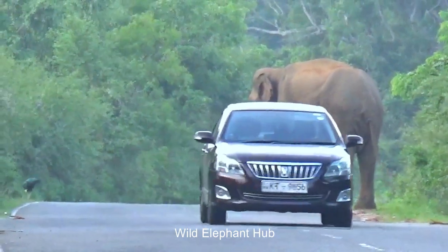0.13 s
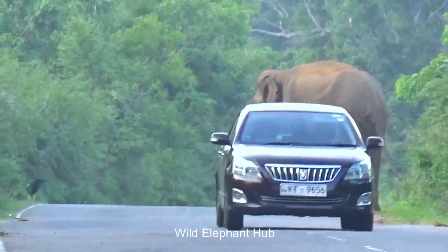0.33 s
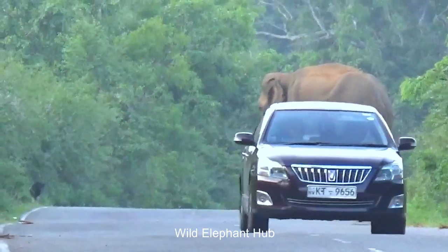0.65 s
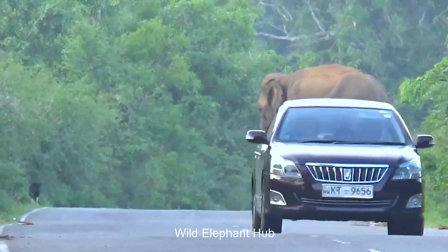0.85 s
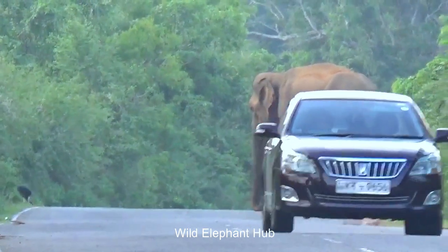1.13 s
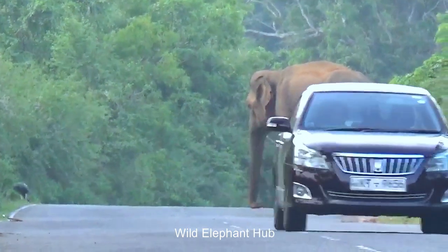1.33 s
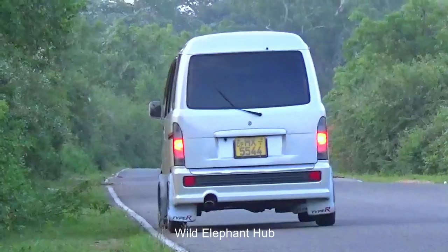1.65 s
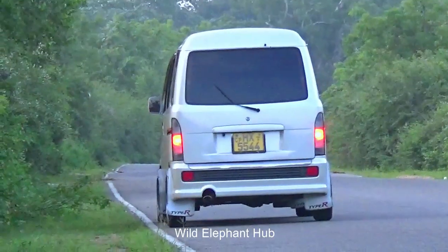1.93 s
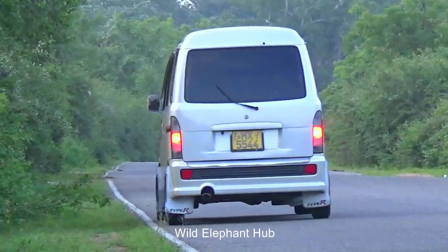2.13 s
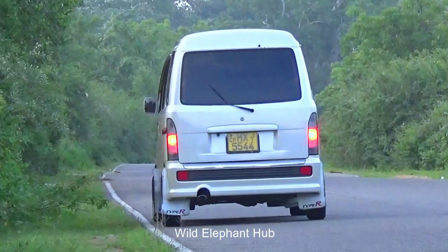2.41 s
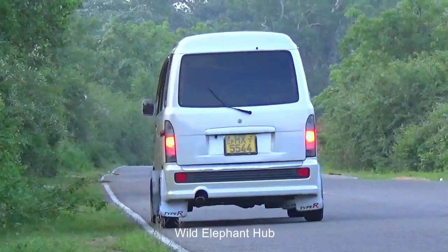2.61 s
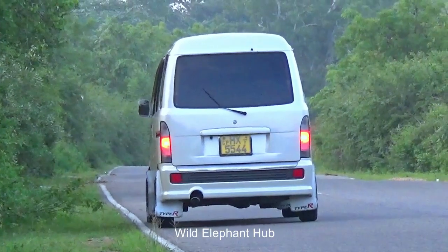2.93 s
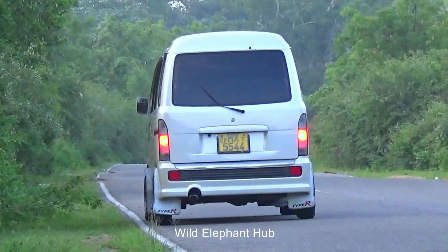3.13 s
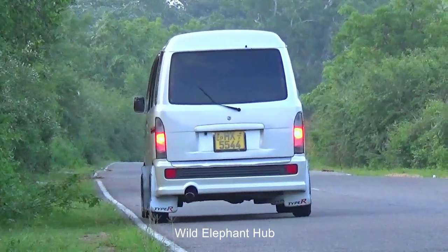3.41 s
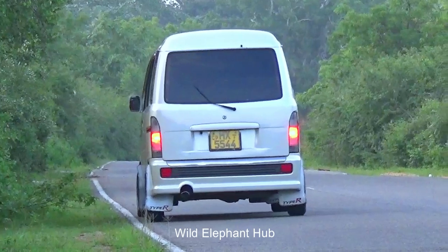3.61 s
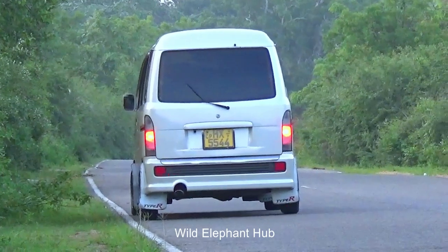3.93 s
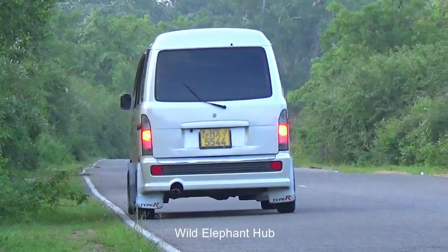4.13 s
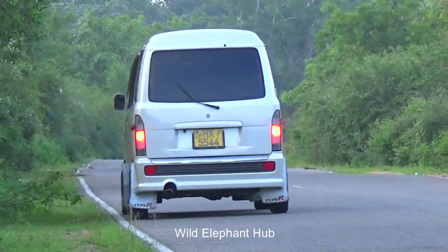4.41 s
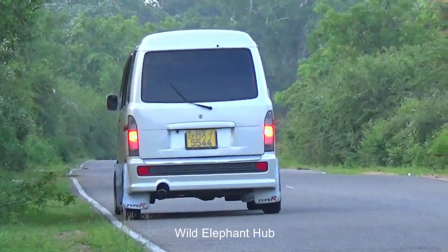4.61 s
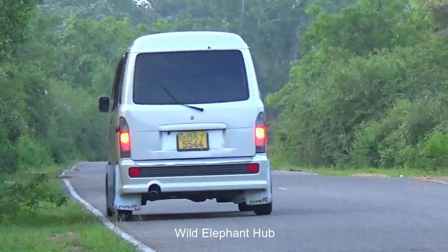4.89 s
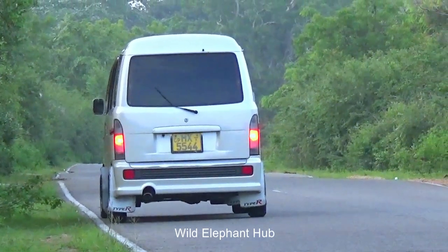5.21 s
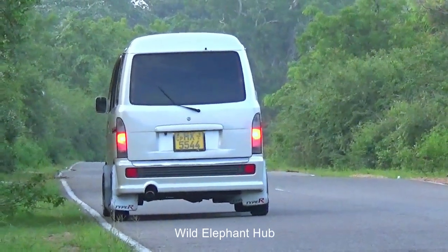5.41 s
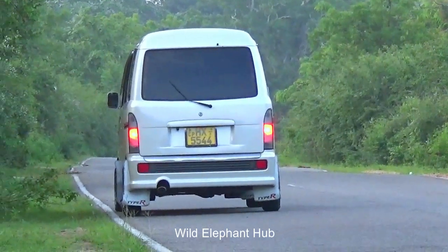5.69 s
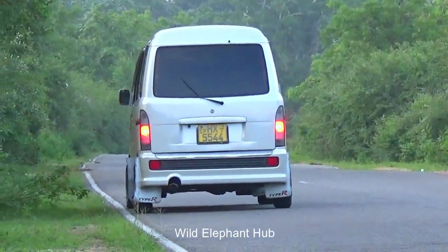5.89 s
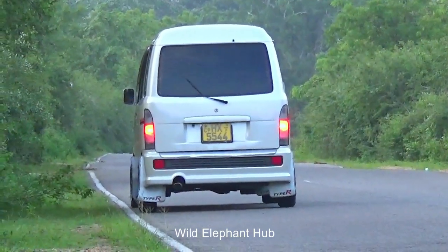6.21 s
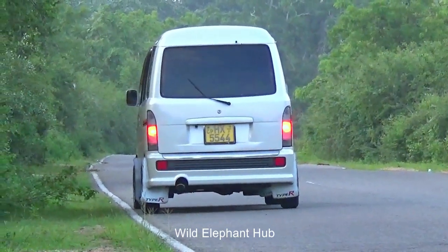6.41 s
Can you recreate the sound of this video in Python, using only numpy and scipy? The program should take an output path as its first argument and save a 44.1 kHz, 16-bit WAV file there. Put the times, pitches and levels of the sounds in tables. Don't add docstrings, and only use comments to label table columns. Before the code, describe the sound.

Tyre roar and a humming tread sweep by and recede, abruptly replaced by a ticking, humming van engine, pulsing cicadas and short bird whistles.

```python
import sys
import numpy as np
from scipy import signal
from scipy.io import wavfile
from scipy.ndimage import uniform_filter1d

SR = 44100
rng = np.random.default_rng(int(sys.argv[2]) if len(sys.argv) > 2 else 0)


def master(y):
    cut = np.clip(np.atleast_2d(y).T, -1, 1)
    pcm = np.round(cut * 32767)
    wavfile.write(sys.argv[1], SR, pcm.astype(np.int16))


def makeup_ratio(level_db):
    decades = np.asarray(level_db, float) / 20
    return 10 ** decades


N = 288855
TIME_S = np.arange(N) / SR
CHANGE_S = 1.5665

# stroke number,
# time in seconds.
FIRST_TEMPO = [(0, .037), (4, .369), (8, .714), (18, 1.563)]


def in_time(rows):
    s, *columns = np.transpose(rows)
    return [np.interp(TIME_S, s, column) for column in columns]


def at_hz(points, hz):
    table_hz, table_db = np.array(points).T
    return np.interp(np.log(hz), np.log(table_hz), table_db)


def rms_one(x):
    return x / np.sqrt(np.mean(x ** 2) + 1e-20)


def drift(rate):
    knots_per_s = 40
    knots = rng.standard_normal(int(N / SR * knots_per_s) + 2)
    memory = np.exp(-2 * np.pi * rate / knots_per_s)
    wander = rms_one(signal.lfilter([1], [1, -memory], knots))
    return np.interp(TIME_S * knots_per_s, np.arange(len(knots)), wander)


def bump(centre_s, span_s):
    return np.exp(-((TIME_S - centre_s) / span_s) ** 2)


def settling(time_s):
    return np.exp(-np.maximum(TIME_S - CHANGE_S, 0) / time_s)


def resonance(x, hz, width_hz):
    r = np.exp(-np.pi * width_hz / SR)
    return signal.lfilter([(1 - r * r) / 2, 0, (r * r - 1) / 2],
                          [1, -2 * r * np.cos(2 * np.pi * hz / SR), r * r], x)


def double_resonance(x, hz, width_hz):
    return resonance(resonance(x, hz, width_hz), hz, width_hz)


def pair(alike):
    mid, side = rng.standard_normal((2, N))
    return np.sqrt((1 + alike) / 2) * mid + np.sqrt((1 - alike) / 2) * side * [[1], [-1]]


def bands(spectrum, patchy_db, spread):
    # frequency in Hz, likeness from 0 to 1.
    likeness = [(60, 1), (250, 0.97), (600, 0.94), (1200, 0.46), (2500, 0.5), (5000, 0.27), (10000, 1)]
    edges = 40 * 2 ** np.arange(0, 8.2, 1 / 3)
    white = rng.standard_normal((2, 2, N))
    for k, (low, high) in enumerate(zip(edges, edges[1:])):
        band_pass = signal.butter(2, [low, high], "band", fs=SR, output="sos")
        mid, side = signal.sosfilt(band_pass, white[k % 2])
        hz = np.sqrt(low * high)
        alike = np.clip(1 - spread * (1 - at_hz(likeness, hz)), 0, 1)
        gain = makeup_ratio(at_hz(spectrum, hz) + patchy_db * drift(6.5))
        yield hz, gain * (np.sqrt(1 + alike) * mid + np.sqrt(1 - alike) * side * [[1], [-1]])


def registers(spectrum, patchy_db, spread, low_db, upper_db, hiss_db):
    parts = np.zeros((4, 2, N))
    for hz, band in bands(spectrum, patchy_db, spread):
        parts[int(hz > 450) + int(hz > 1500) + int(hz > 3200)] += band
    low, middle, upper, hiss = map(rms_one, parts)
    return middle + makeup_ratio(low_db) * low + makeup_ratio(upper_db) * upper + makeup_ratio(hiss_db) * hiss


def trees(x, t60, count):
    near_leaves, near_t60 = 2.5, 0.044
    lags = rng.uniform(.002, .09, (3, count))
    tail = np.zeros((3, SR // 10))
    for k, lag in enumerate(lags):
        strength = makeup_ratio(-60 * lag / t60) + near_leaves * makeup_ratio(-60 * lag / near_t60)
        tail[k, (lag * SR).astype(int)] = strength * rng.standard_normal(count)
    shared = np.array([np.roll(tail[2], 1), tail[2]])
    tail = shared + 1.3 * tail[:2]
    tail = tail / np.sqrt((tail ** 2).sum(1, keepdims=True))
    return signal.fftconvolve(x[None], tail, axes=1)[:, :N]


def strokes(tempo):
    number, s = np.transpose(tempo)
    return np.interp(np.arange(number[-1] + 1), number, s)


def chorus():
    # frequency in Hz, width in Hz, level in dB.
    song_peaks = [(6565, 1200, -4), (7020, 790, -4.5), (7520, 290, -3.5), (10550, 210, -22)]
    air = rng.standard_normal(N + 1)
    air = np.array([air[:-1], air[1:]]) + 0.17 * pair(0)
    far = 0
    for k, (hz, width_hz, db) in enumerate(song_peaks):
        far = far + makeup_ratio(db + drift(10.0)) * double_resonance(air, hz, width_hz) * (-1) ** k
    first = strokes(FIRST_TEMPO)
    cycle = np.interp(TIME_S, first, np.arange(len(first)))
    breath = 1 - .6 * np.clip(np.cos(2 * np.pi * (cycle - .64)), 0, 1)
    breath = np.where(TIME_S < CHANGE_S, breath, 1)
    level_db = np.where(TIME_S < CHANGE_S, -35, -40.5 + 4 * settling(0.54))
    return makeup_ratio(level_db - 6.5) * breath * rms_one(far)


def leaves():
    return makeup_ratio(-54) * bump(2.55, 0.015) * rms_one(resonance(pair(.7), 5500, 1500))


def cricket():
    # start in seconds, length in seconds, level in dB.
    chirp_bouts = [
        (1.68, 1.15, -63.5),
        (4.1, .75, -62.5),
        (5.2, .12, -66),
        (5.866, .8, -64.5),
    ]
    trills_per_s, fade_s, rest_db = 9.35, 0.12, -67
    uneven = .4 + .6 * drift(5.0)
    level = makeup_ratio(rest_db)
    for s, length_s, db in chirp_bouts:
        fade = np.clip(np.minimum(TIME_S - s, s + length_s - TIME_S) / fade_s + .5, 0, 1)
        trill = np.clip(np.cos(2 * np.pi * trills_per_s * (TIME_S - s)) + uneven, 0, 1.2)
        level = level + makeup_ratio(db) * fade * trill
    return rms_one(resonance(resonance(pair(0.86), 3900, 340), 4250, 380)) * level


def bird():
    # start in seconds, length in seconds, from Hz, to Hz, level in dB.
    slurs = [(2.3, .05, 4700, 4000, -59), (4.16, .03, 3900, 3400, -52), (4.197, .07, 5150, 3500, -53.5),
             (4.4, .04, 3900, 3200, -52), (4.445, .06, 5050, 3550, -55), (4.665, .033, 3800, 3150, -49),
             (4.695, .068, 5050, 3650, -56), (4.93, .038, 3750, 2950, -48.5),
             (4.968, .067, 4800, 3250, -54), (5.295, .055, 4850, 4100, -55.5), (5.94, .05, 2950, 3050, -59),
             (6.225, .03, 3600, 3200, -50), (6.255, .048, 4950, 4300, -55)]
    out = np.zeros(N)
    hoarse = 1 + .32 * rms_one(uniform_filter1d(rng.standard_normal(N), size=300))
    for s, length_s, from_hz, to_hz, db in slurs:
        n, i = round(length_s * SR), round(s * SR)
        place = np.linspace(0, 1, n)
        bend = 1.6 if from_hz > 4500 else 1
        glide_hz = from_hz + (to_hz - from_hz) * place ** bend
        swell = .5 + .5 * np.exp(-((place - .52) / .2) ** 2)
        whistle = np.sin(2 * np.pi * np.cumsum(glide_hz) / SR)
        out[i:i + n] += makeup_ratio(db) * signal.windows.tukey(n, .3) * swell * whistle
    echo = makeup_ratio(-4) * trees(out, t60=.3, count=80)
    return makeup_ratio(1) * (out * hoarse + echo)


def cicada(cycles, sweep, gap_s, level_db, rib_hz, rough, spread_db):
    s, hz, db = np.transpose(sweep)
    t = np.arange(s[0], s[-1], 1 / SR)
    fall_hz, fall_db = np.interp(t, s, hz), np.interp(t, s, db)
    fade = signal.windows.tukey(len(t), .2)
    snap_s = np.linspace(s[0], s[-1], 9)
    starts = np.add.outer(np.ravel(cycles) + s[0], [0, gap_s]).ravel()
    out = np.zeros(N + len(t) + SR)
    for start in starts:
        pitch, phase, force, rate = rng.standard_normal(4)
        tone = np.sin(2 * np.pi * np.cumsum(fall_hz * (1 + 0.0138 * pitch)) / SR + 9 * phase)
        ribs = 1 + rough * np.cos(2 * np.pi * rib_hz * (1 + 0.14 * rate) * t + 9 * force)
        ribs = ribs * makeup_ratio(.9 * np.interp(t, snap_s, rng.standard_normal(9)))
        i = max(round(start * SR), 0)
        out[i:i + len(t)] += makeup_ratio(level_db + spread_db * force + fall_db) * fade * ribs * tone
    return out[:N]


def near_cicadas():
    # stroke number, time in seconds.
    high_tempo = [(0, 1.608), (3, 1.867), (8, 2.306), (11, 2.564), (16, 3.002), (17, 3.095), (21, 3.444),
                  (22, 3.541), (25, 3.796), (26, 3.888), (32, 4.409), (34, 4.593), (42, 5.286), (49, 5.901),
                  (54, 6.342), (56, 6.522)]
    low_tempo = [(0, 1.65), (3, 1.908), (9, 2.432), (15, 2.966), (17, 3.135), (20, 3.402), (30, 4.278),
                 (31, 4.372), (36, 4.832), (43, 5.434), (46, 5.704), (47, 5.79), (52, 6.233), (55, 6.494)]
    # seconds from the cycle mark, frequency in Hz, level in dB.
    high_sweep = [(-.002, 10500, -30), (-.0015, 8500, -16), (-.0007, 7900, -3), (.0015, 7350, 0),
                  (.006, 6700, -6), (.011, 5900, -16)]
    low_sweep = [(-.0085, 7700, -15), (-.0065, 7250, -3), (-.0035, 6850, 0), (0, 6300, -6.5),
                 (.0045, 5500, -21)]
    first, gap_s = strokes(FIRST_TEMPO), .0245
    near = cicada(first, low_sweep, gap_s, level_db=-50, rib_hz=520, rough=0.67, spread_db=4)
    near += cicada(first - .0095, high_sweep, gap_s, level_db=-42, rib_hz=503, rough=0.34, spread_db=6)
    near += cicada(first - .024, high_sweep, gap_s * 2, level_db=-45, rib_hz=497, rough=0.32, spread_db=0)
    near *= TIME_S < CHANGE_S
    near += cicada(strokes(high_tempo), high_sweep, .023, level_db=-35.5, rib_hz=440, rough=.3, spread_db=.7)
    near += cicada(strokes(low_tempo), low_sweep, .0235, level_db=-35, rib_hz=470, rough=.3, spread_db=.7)
    direct = np.array([np.roll(near, 1) * makeup_ratio(0.7), near])
    return direct + makeup_ratio(-5) * trees(near, t60=0.3, count=150)


def engine_hum(firing_hz, load_db):
    # frequency in Hz, level in dB.
    exhaust = [(38, -61), (47, -69), (59, -61.5), (90, -67), (118, -53.5), (145, -58), (163, -63),
               (180, -61)]
    turn = 2 * np.pi * np.cumsum(firing_hz) / SR
    hum = 0
    for k, load_share in enumerate([0.48, 1, 1], 1):
        order_db = at_hz(exhaust, k * firing_hz) + load_share * load_db
        hum = hum + np.sqrt(2) * makeup_ratio(order_db + 0.6 * drift(2.3)) * np.sin(k * turn + k)
    return hum


def running_noise():
    # frequency in Hz, level in dB per Hz.
    floor = [(24, -54), (40, -26), (250, -15), (364, -2.5), (687, -2), (1490, -8), (1800, -14.5),
             (2390, -16.5), (5070, -22.5), (7040, -26.5), (11000, -29.5), (14300, -71), (22000, -120)]
    # frequency in Hz, width in Hz, dB when revving, dB when idling.
    panels = [(221.5, 110, -13, -12), (290, 62, -7, -10.5), (467, 91, -11, -4), (602, 62, -4.5, -8.5),
              (702.7, 116, -7, 0), (806, 84, -25, -8.5), (1074, 270, -5.5, 0.5), (1260, 204, -3.5, -12),
              (1411, 170, -14, -5), (1660, 330, -4.5, -52), (1934, 290, -13, -12.5)]
    idle_db = -43.5
    level_db = idle_db + 8.5 * settling(0.8) - 1.0446 * (TIME_S - CHANGE_S)
    low_db = -8.5 - 0.66 * (TIME_S - 3.38) ** 2
    hiss_db = -11 + 0.44 * (idle_db - level_db)
    idle, air, body = np.interp(TIME_S, [2.4, 4.0], [0, 1]), pair(1.0), 0
    for k, (hz, width_hz, revving_db, idling_db) in enumerate(panels):
        panel_db = revving_db + idle * (idling_db - revving_db) + (low_db + 10.5) * (hz < 450)
        gain = makeup_ratio(panel_db + 1.7 * drift(1.4)) * np.sqrt(SR / width_hz / 9)
        body = body + gain * double_resonance(air, hz, width_hz) * (-1) ** k
    broad = registers(floor, 0.6, 1.0, low_db, -7.5, hiss_db)
    running = makeup_ratio(level_db) * (makeup_ratio(-1.5) * broad + makeup_ratio(3) * body)
    return running - 0.59 * resonance(running, 370.5, 89)


def valve_ticks():
    # offset in seconds, frequency in Hz, level in dB, t60 in seconds.
    taps = [
        (.001, 2438, -45.5, 0.023),
        (0.041, 3000, -61, 0.0021),
        (.043, 2416, -48, 0.049),
    ]
    period_s = .08
    cycles = np.arange(19, int(N / SR / period_s)) * period_s + .04
    ticks = np.zeros(N)
    for offset_s, hz, db, t60 in taps:
        times = cycles + offset_s + .0015 * rng.standard_normal(len(cycles))
        blows = np.zeros(N)
        blows[(times * SR).astype(int)] = makeup_ratio(db + 1.8 * rng.standard_normal(len(cycles)))
        r, w = makeup_ratio(-60 / (t60 * SR)), 2 * np.pi * hz / SR
        ring = signal.lfilter([0, np.sin(w)], [1, -2 * r * np.cos(w), r * r], blows + 1e-18)
        if t60 >= .01:
            ring = makeup_ratio(3) * resonance(ring, hz, 4.4 / t60)
        ticks += ring
    return ticks


def van():
    # time in seconds, firing rate in Hz, load in dB.
    engine_course = [(1.57, 58, 2), (2.3, 59.5, -1), (2.48, 59.6, -4.5), (2.7, 61, -15), (2.9, 59.4, -17),
                     (3.06, 53, -2.5), (3.2, 44, -20), (3.3, 40.4, -25), (3.9, 38, -27), (4.04, 44.8, -22),
                     (4.14, 45.5, -8), (4.93, 47, -5), (5.9, 48.2, -14), (6.55, 51, -14)]
    hum = engine_hum(*in_time(engine_course))
    whirr = rms_one(resonance(resonance(pair(0.38), 2220, 420), 2540, 420))
    whirr = makeup_ratio(-60.5) * whirr * makeup_ratio(1.88 * drift(11.0))
    boom = makeup_ratio(-71) * rms_one(double_resonance(pair(0.94), 117, 140))
    pan = makeup_ratio(-0.96 * np.array([[.5], [-.5]]))
    return (running_noise() + hum + boom) * pan + valve_ticks() + whirr


def tread_note():
    # time in seconds, frequency in Hz, level in dB.
    tread_course = [
        (0, 700, -35.5),
        (.2, 900, -29.5),
        (.45, 1074, -27),
        (.88, 1034, -25),
        (1.0, 1077, -31),
        (1.57, 1143, -52),
    ]
    tread_hz, tread_db = in_time(tread_course)
    turn = 2 * np.pi * np.cumsum(tread_hz) / SR
    slow = signal.butter(2, 140 / 2, fs=SR, output="sos")
    note = signal.sosfilt(slow, pair(0.93)) * np.sin(turn) + signal.sosfilt(slow, pair(0.94)) * np.cos(turn)
    return makeup_ratio(tread_db + 1.8 * drift(3.8)) * rms_one(note)


def car():
    # time in seconds, tyre roar in dB, left-right balance in dB.
    car_pass = [
        (0.0, -24.5, -0.5),
        (0.28, -25.5, -3),
        (0.52, -24.5, -3.5),
        (0.84, -29.5, -2),
        (1.0, -31.5, -1.5),
        (1.26, -33, -1),
        (1.567, -35.5, -1.5),
    ]
    # frequency in Hz, level in dB per Hz.
    tyre_roar = [(24, -74), (40, -58), (124, -20.5), (256, -4.5), (556, -6.5), (656, -7), (955, -6.5),
                 (1050, 1.5), (1330, -9.5), (2390, -7.5), (3320, -24), (5190, -28.5), (6720, -30),
                 (11000, -40.5), (14300, -74), (22000, -120)]
    roar_db, pan_db = in_time(car_pass)
    abreast_s, shadow_s = 0.27, 0.58
    rumble_db = -11 + 8.5 * bump(abreast_s, 0.19) - 3.5 * bump(shadow_s, 0.41)
    upper_db = -7 - 4 * bump(abreast_s + 0.037, 0.24) + 2.2 * bump(shadow_s + 0.25, 0.13)
    hiss_db = -16.5 + 0.26 * (roar_db.max() - roar_db)
    direct = registers(tyre_roar, 1.0, 0.62, rumble_db, upper_db, hiss_db)

    late = np.arange(N) - SR / 1000 * 1.115
    echo = np.array([np.interp(late, np.arange(N), side) for side in direct])
    echo = signal.lfilter([.3], [1, -.7], echo)

    cavity = resonance(direct, 733, 120) * 0.71
    cavity += resonance(direct, 1720, 180) * np.interp(TIME_S, [.3, 1.0], [.1, .9])
    cavity += 0.51 * bump(0.54, 0.078) * resonance(direct, 1320, 310)
    nose = 0.33 * resonance(direct, 740, 200) - 0.26 * resonance(direct, 1120, 390)
    cavity += bump(0.02, 0.36) * nose
    roar = makeup_ratio(roar_db) * (direct + 0.13 * echo + cavity)
    return (roar + tread_note()) * makeup_ratio(np.outer([.5, -.5], pan_db))


def scene():
    wildlife = chorus() + leaves() + cricket() + bird() + near_cicadas()
    return wildlife + np.where(TIME_S < CHANGE_S, car(), van())


def band_limit(x):
    return signal.sosfilt(signal.butter(12, 15800, fs=SR, output="sos"), x)


def record(dry):
    camera = signal.sosfilt(signal.ellip(12, .5, 65, 11200, fs=SR, output="sos"), dry)
    camera = signal.sosfilt(signal.butter(2, 48, "high", fs=SR, output="sos"), camera)
    mono = dry.mean(0)

    hiss = makeup_ratio(-79) * (drift(12.0) > -.5) * rng.standard_normal(N)
    overtone_band = signal.butter(6, [14100, 15300], "band", fs=SR, output="sos")
    treble = makeup_ratio(-4.5) * signal.sosfilt(overtone_band, .6 * mono ** 2 + hiss)
    treble *= TIME_S > .87
    edge_band = signal.butter(4, [11200, 11750], "band", fs=SR, output="sos")
    edge = signal.sosfilt(edge_band, mono) * (drift(12.0) > .4)
    treble += makeup_ratio(-14) * (TIME_S > CHANGE_S) * edge

    step = np.zeros(N)
    step[[1, round(CHANGE_S * SR)]] = makeup_ratio(np.array([-38, -33]))
    step = signal.lfilter([1], [1, -np.exp(-1 / (0.001 * SR))], step)
    return band_limit(camera + treble + step)


dry = scene()
out = record(dry)
master(out)
```